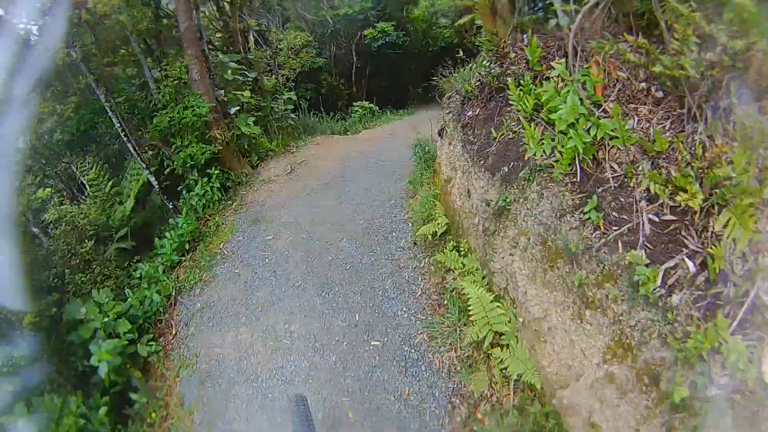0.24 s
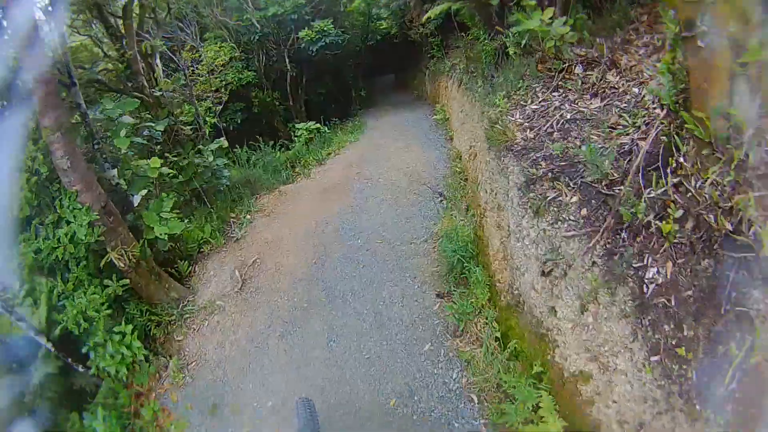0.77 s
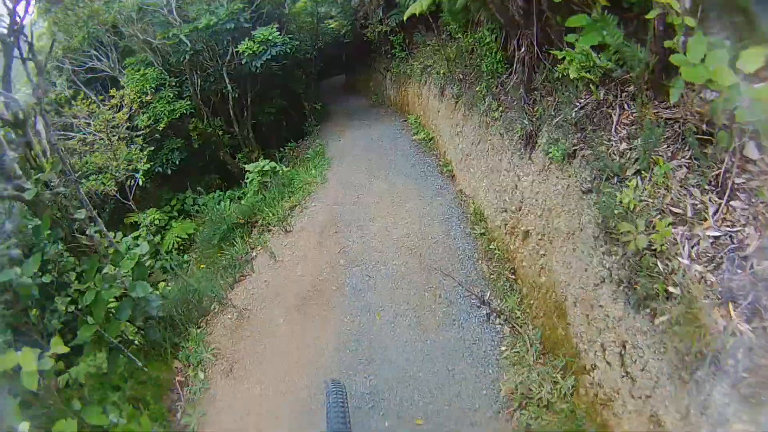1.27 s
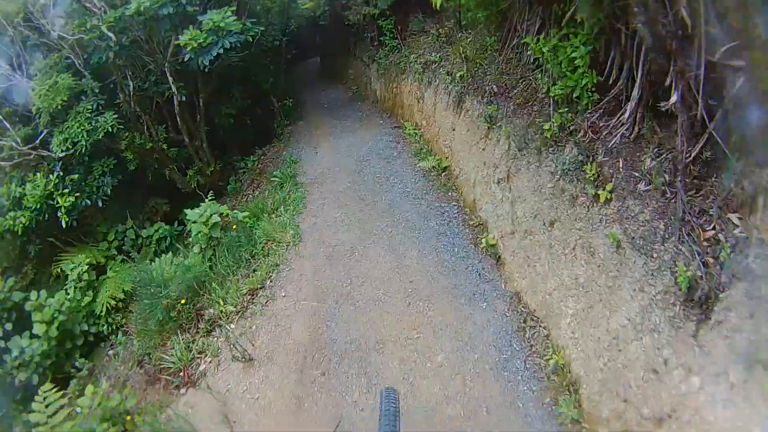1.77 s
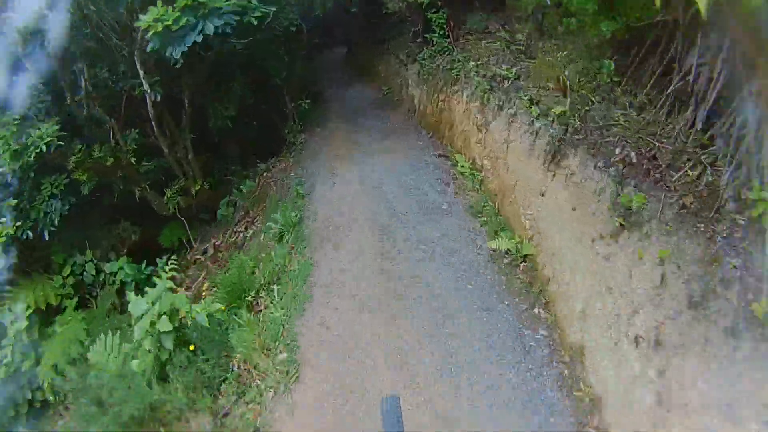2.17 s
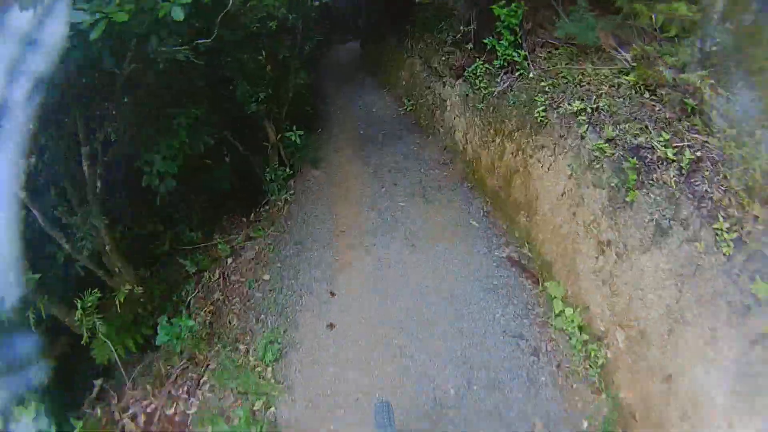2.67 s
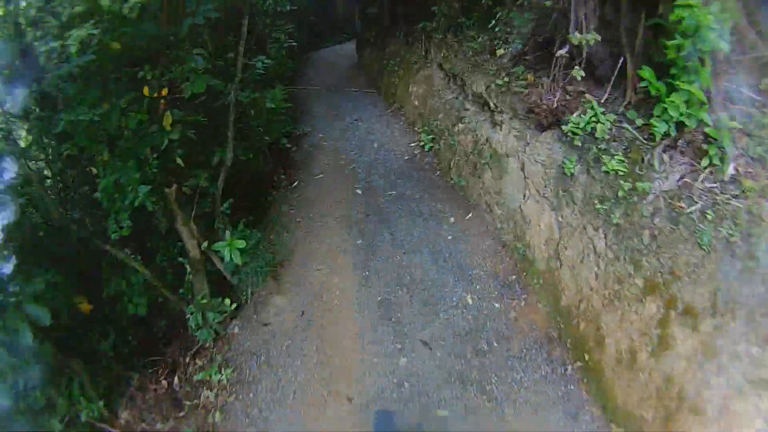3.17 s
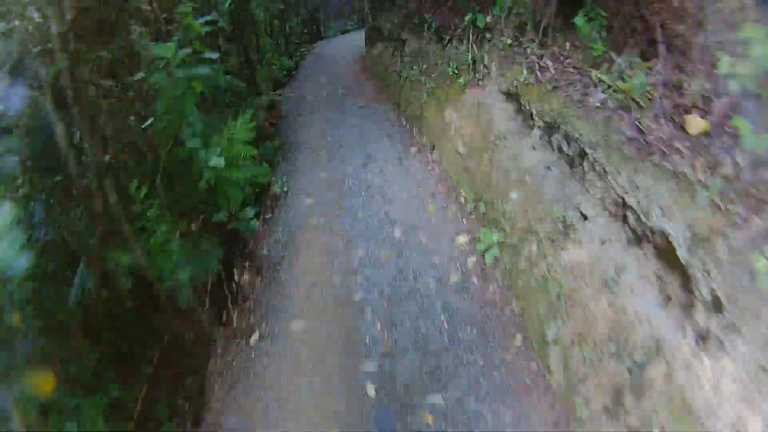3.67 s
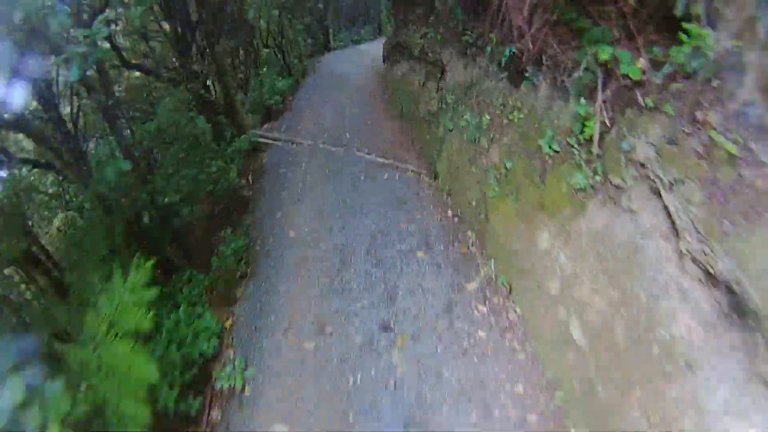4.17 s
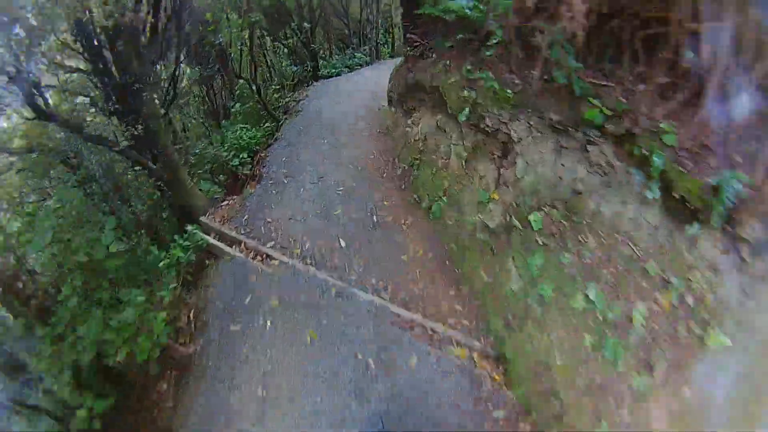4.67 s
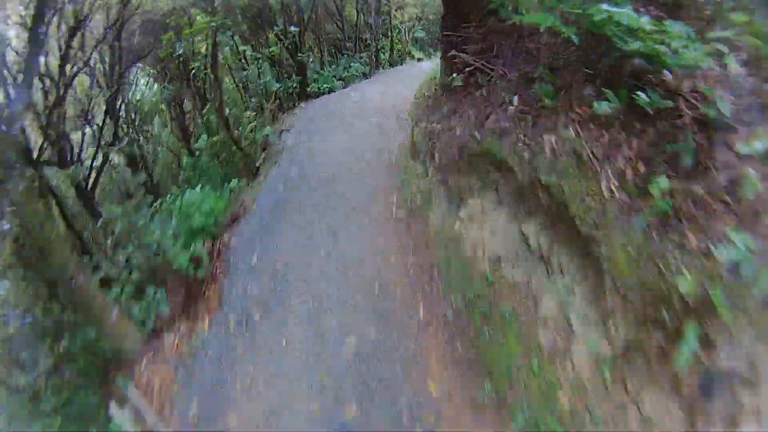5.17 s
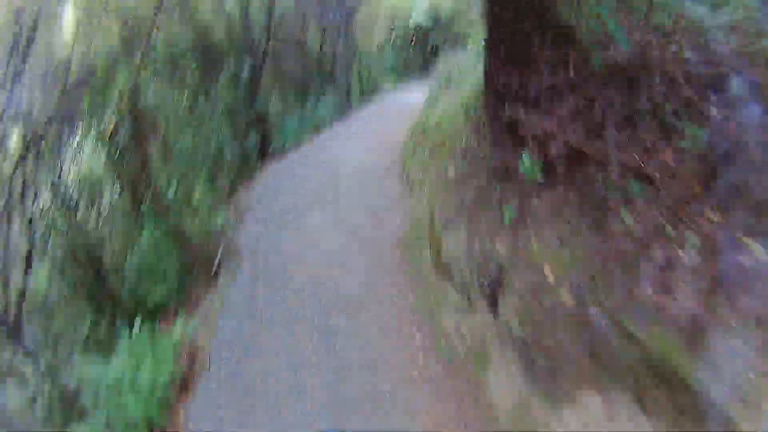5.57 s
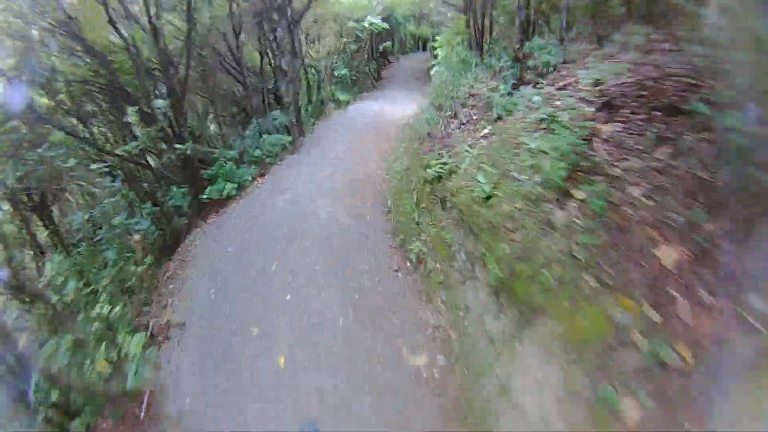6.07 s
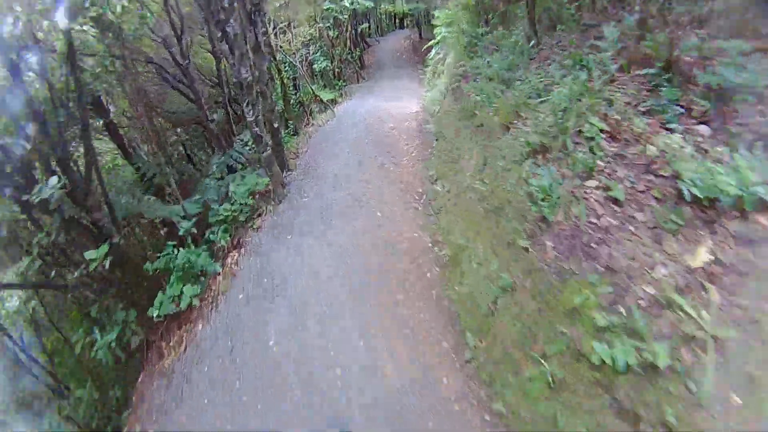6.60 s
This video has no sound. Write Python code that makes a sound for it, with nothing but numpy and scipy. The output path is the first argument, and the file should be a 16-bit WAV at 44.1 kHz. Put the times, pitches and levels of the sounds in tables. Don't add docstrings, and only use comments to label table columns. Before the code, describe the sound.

Close, dry sound from a microphone inside a plastic camera housing on a bicycle. Gravel crunches faintly over a low rumble, with sparse light taps at first. After two seconds bumps thicken into dull knocks, buzzing parts and short cracks, peaking near five and a half seconds with a hard slam and a faint low cable twang. It then eases to soft rolling, with slight hiss and thin whine.

```python
import sys
import numpy as np
from scipy import signal
from scipy.io import wavfile
from scipy.ndimage import uniform_filter1d

SR = 44100
rng = np.random.default_rng(int(sys.argv[2]) if len(sys.argv) > 2 else 0)


def level_to_linear(level):
    exponent = np.asarray(level, float) / 20
    return 10 ** exponent


def waveform_to_disk(signal):
    frames = np.transpose(np.atleast_2d(signal))
    scaled = np.clip(frames, -1, 1) * 32767
    samples = np.round(scaled).astype(np.int16)
    wavfile.write(sys.argv[1], SR, samples)


N = 301633

# centre_hz, width_hz, level_db
LOWER_PEAKS = [(487, 93, -3), (918, 120, -4.5), (1026, 100, -1.5), (1273, 244, 4.5), (1461, 255, 3)]
# centre_hz, width_hz, level_db
UPPER_PEAKS = [(1706, 300, -7.5), (1990, 115, 1), (2140, 97, 1), (2660, 310, -13)]
# centre_hz, width_hz, level_db
BRIGHT_PEAKS = [(3128, 174, 6), (4000, 242, 5.5), (4530, 500, -4.5), (5710, 360, -5.5), (7320, 510, -12),
                (11370, 160, -12.5)]


def rms_one(x):
    return x / np.sqrt(np.mean(x ** 2) + 1e-20)


def drift(rate_hz):
    pole = np.exp(-80 * np.pi * rate_hz / SR)
    white = rng.standard_normal(N // 40 + 2002)
    slow = signal.lfilter([1], [1, -2 * pole, pole * pole], white)[2000:]
    return np.interp(np.arange(N) / 40, np.arange(len(slow)), rms_one(slow))


def add(track, start_s, sound):
    i = round(start_s * SR)
    track[i:i + len(sound)] += sound[:N - i]


def low_pass(x, order, cutoff_hz):
    return signal.sosfilt(signal.butter(order, cutoff_hz, fs=SR, output="sos"), x)


def resonate(x, peaks):
    out = 0
    for k, (centre_hz, width_hz, level_db) in enumerate(peaks):
        r = np.exp(-np.pi * width_hz / SR)
        b = [(1 - r * r) / 2, 0, (r * r - 1) / 2]
        a = [1, -2 * r * np.cos(2 * np.pi * centre_hz / SR), r * r]
        out = out + (-1) ** k * level_to_linear(level_db) * signal.lfilter(b, a, x)
    return out


def decay(t_s, t60_s):
    return level_to_linear(-60 * t_s / t60_s)


def coloured(spectrum, low_hz, count, patchy_db):
    edges_hz = low_hz * 2 ** (np.arange(count + 1) / 2)
    points_hz, points_db = np.transpose(spectrum)
    white = rng.standard_normal((2, N + SR))
    together = drift(4.8)
    out = 0
    for k, (low, high) in enumerate(zip(edges_hz, edges_hz[1:])):
        sos = signal.butter(2, [low, high], "band", fs=SR, output="sos")
        band = signal.sosfilt(sos, white[k % 2])[SR:]
        level_db = np.interp(np.log(low * high) / 2, np.log(points_hz), points_db)
        flicker_db = patchy_db * (together + 1.42 * drift(18.2))
        out = out + band * level_to_linear(level_db + flicker_db)
    return rms_one(out)


def grit(per_s, spread_db, clump_db):
    size_db = spread_db * np.minimum(rng.exponential(1, N), 5)
    sizes = level_to_linear(size_db) * rng.choice([-1, 1], N)
    born = rng.random(N) < per_s / SR
    return rms_one(sizes * born * level_to_linear(clump_db * drift(22.0)) + 1e-18)


def housing_knocks():
    # start_s, swing_db, contact_db
    knocks = [(0.132, -31.5, -40.5), (0.246, -33.5, -40), (1.732, -31, -40), (1.797, -36.5, -52),
              (2.19, -19.5, -27.5), (2.54, -25, -30.5), (2.633, -32.5, -42), (2.687, -31.5, -42),
              (2.823, -28, -40), (2.984, -27, -37), (3.043, -34.5, -59), (3.42, -22, -31),
              (3.504, -30.5, -41.5), (3.615, -26, -32.5), (3.725, -33, -43), (3.774, -33.5, -42.5),
              (3.92, -26.5, -31.5), (4.229, -20.5, -31.5), (4.381, -22, -30), (4.457, -32.5, -41),
              (4.557, -25, -31), (4.703, -32, -50), (4.873, -29.5, -35.5), (5.205, -29.5, -42.5),
              (5.296, -25, -32), (5.372, -26, -30.5), (5.827, -30.5, -46)]
    # start_s, swing_db, contact_db
    nudges = [(0.031, -38, -62), (0.092, -47, -55), (0.184, -47, -51), (0.377, -43.5, -50),
              (0.568, -47.5, -53), (0.641, -41.5, -54), (0.762, -47.5, -59), (0.869, -42.5, -57),
              (1.041, -48, -58), (1.258, -53, -58), (1.696, -46, -49), (1.873, -40.5, -58),
              (2.296, -48.5, -51), (2.353, -39.5, -69), (2.459, -37, -52), (2.778, -43, -54),
              (4.946, -40.5, -52), (5.979, -48, -53), (6.073, -43.5, -54), (6.432, -48, -54),
              (6.513, -46.5, -46.5), (6.571, -48, -55), (6.662, -38.5, -41.5)]
    # start_s, swing_db, contact_db
    slams = [
        (3.3295, -21.5, -31.5),
        (4.829, -40, -42.5),
        (5.044, -38.5, -50),
        (5.116, -19, -22),
        (5.481, -14.5, -23),
    ]
    # start_s, swing_db, contact_db
    backstops = [
        (2.134, -36.5, -40),
        (3.549, -33.5, -42.5),
        (3.841, -31, -41),
        (3.992, -33.5, -37),
        (4.332, -32.5, -35),
        (5.234, -30, -36),
        (5.429, -34, -35),
        (5.582, -29.5, -26),
        (6.788, -39, -46.5),
    ]
    # start_s, swing_db, contact_db
    rebounds = [(1.455, -41.5, -50), (2.199, -32, -35), (2.587, -54, -48), (3.356, -23, -33.5),
                (3.38, -23, -25.5), (3.433, -40, -21), (3.823, -35, -41), (3.972, -40, -34),
                (4.264, -38, -29), (5.17, -44, -29), (5.218, -26, -30), (5.545, -24, -20),
                (5.66, -40.5, -40), (6.002, -39, -45), (6.214, -54, -51), (6.471, -50, -54)]
    knock_kind = -1.056, 0.0014, 56.3, (0.04, -4.5), (0.45, 2.5), (1, 0)
    nudge_kind = -1.09, .0008, 61, (0.28, -2.3), (0.46, 1.4), (1, 0)
    slam_kind = -0.99, 0.00075, 78.4, (.1, -6.5), (0.5, 1.7), (0.82, 0)
    backstop_kind = 0.99, 0.0004, 76.5, (0.93, -6), (1, 11.1), (0.42, 0)
    rebound_kind = -0.85, 0.0015, 65.3, (0.55, -5), (0.66, 0), (.4, -13)
    # mode_hz, level_db, t60_s
    mount = [(182.9, 0, 0.072), (253.7, -5.5, 0.033)]
    # mode_hz, level_db, t60_s
    body = [(330.5, -9, 0.057), (495.6, 2, 0.032), (626, -50, 0.0042), (886, -16, 0.054)]
    # mode_hz, level_db, t60_s
    shell = [(1218, -14, 0.014), (1330, 0, 0.018), (1780, -8, 0.018), (1930, -60, 0.01), (3120, -16, 0.018),
             (5600, 1, 0.0023)]
    lag_s = 0.0042
    stiffen_hz_per_db = 0.78
    stiff_damping_power = 0.42

    out, t = np.zeros(N), np.arange(round(.14 * SR)) / SR
    modes = mount + body + shell
    for blows, (way, contact_s, kind_hz, *laws) in ((knocks, knock_kind), (nudges, nudge_kind),
                                                    (slams, slam_kind), (backstops, backstop_kind),
                                                    (rebounds, rebound_kind)):
        spreads_db = rng.normal(0, 2.8, (len(blows), len(modes)))
        detunes = 1 + rng.normal(0, .025, spreads_db.shape)
        contact = 1 - np.exp(-t / contact_s)
        swing_t60_s = 0.062 * (56 / kind_hz) ** stiff_damping_power
        for (start_s, swing_db, hit_db), spread_db, detune in zip(blows, spreads_db, detunes):
            mount_db, body_db, shell_db = [swing_db + share * (hit_db - swing_db) + db for share, db in laws]
            swing_hz = np.clip(kind_hz + stiffen_hz_per_db * (swing_db + 32.5), 40, 120)
            turns = swing_hz * t * (0.65 + 0.42 * np.exp(-t / 0.034))
            swing = np.cos(2 * np.pi * turns - .25) * (1 + t / 0.0057) * decay(t, swing_t60_s)
            sound = level_to_linear(swing_db + 3.5) * swing * contact
            levels_db = [mount_db + 2.5] * len(mount) + [body_db - 5.5] * len(body)
            levels_db = levels_db + [shell_db + 5.0] * len(shell) + spread_db
            for (mode_hz, mode_db, t60_s), level_db, bend in zip(modes, levels_db, detune):
                ring = np.sin(2 * np.pi * mode_hz * bend * t) * decay(t, t60_s)
                sound += level_to_linear(level_db + mode_db) * ring
            add(out, start_s + lag_s - 0.00136 * (way > 0), way * sound)
    return low_pass(out + 1e-18, 3, 2600)


def rattles():
    # start_s, level_db, upper_share_db
    single_taps = [(0.0487, -49.5, 15.5), (0.237, -49.5, 8.5), (0.455, -40, -1), (0.5292, -43, -9),
                   (0.695, -50, 9), (0.945, -55.5, 14.5), (1.1712, -58, 19), (1.538, -51, -2),
                   (2.1756, -35, -25), (2.259, -54, 9), (3.116, -46, 0), (3.5823, -50, -8),
                   (3.811, -51, 14), (4.349, -27.5, -0.5), (5.227, -42.5, 12.5), (5.514, -23, -11),
                   (5.529, -27.5, -35), (5.5833, -16.5, -3.5), (5.694, -53, 14), (6.114, -52, 9),
                   (6.185, -50, 9), (6.327, -53, 14.5), (6.372, -57, 10), (6.394, -48.5, 6.5),
                   (6.471, -43.5, -4), (6.7395, -45, -2)]
    # start_s, level_db, length_s, upper_share_db, bright_share_db
    buzzes = [(2.595, -40, .03, -13, -23), (2.64, -35, .0058, -16, -26), (3.348, -32, .023, -14, -20),
              (3.398, -40, 0.0094, -6, -23), (3.435, -30, 0.019, -3, -21), (3.626, -33.5, .026, -4, -17),
              (3.657, -32.5, 0.037, -11, -19), (3.7, -37.5, 0.046, -3, -14), (4.018, -38.5, 0.02, 6, -16),
              (4.268, -48, .01, -6, -9), (4.47, -37.5, 0.058, -16, -20), (4.568, -37.5, 0.024, -16, -17),
              (4.613, -37.5, 0.0084, 0, -25), (4.817, -54, .006, -16, -24),
              (5.118, -34.5, 0.035, -6, -15.5), (5.233, -34.5, 0.026, -15, -20),
              (5.282, -39.5, .01, 0, -24), (5.413, -45, .008, -12, -30), (5.491, -31.5, 0.036, -1.5, -13),
              (5.542, -30, 0.034, -10, -16), (5.578, -23.5, 0.008, -6, -23), (5.593, -34, 0.0062, -7, -15)]
    tap_s, tap_bright_db, tap_bright_follows = 0.0055, -18, 0.65

    touches, t = np.zeros((3, N)), np.arange(round(.09 * SR)) / SR
    chatter = grit(per_s=4000.0, spread_db=2.5, clump_db=1.5)
    events = [(start_s, level_db, tap_s, upper_db, tap_bright_db + tap_bright_follows * upper_db)
              for start_s, level_db, upper_db in single_taps]
    for start_s, level_db, length_s, upper_db, bright_db in events + buzzes:
        i = round(start_s * SR)
        run = chatter[i:i + len(t)] * decay(np.maximum(t - length_s, 0), 0.0071)
        run[0] = 0.085 / (length_s + 0.0021)
        for part, share_db in zip(touches, (0, upper_db, bright_db)):
            add(part, start_s, level_to_linear(level_db + 5.5 + share_db) * run)
    lower, upper, bright = [resonate(part + 1e-18, peaks)
                            for part, peaks in zip(touches, (LOWER_PEAKS, UPPER_PEAKS, BRIGHT_PEAKS))]
    return low_pass(lower + upper, 2, 2800) + signal.lfilter([.6], [1, -.4], bright)


def seal_cracks():
    # start_s, step_db, sharpness_hz
    slips = [(2.2112, -25, 500), (3.3843, -22, 12000), (3.4426, -30.5, 12000), (4.349, -40, 8000),
             (5.13, -37, 14000), (5.1664, -32, 4000), (5.1717, -35, 4000), (5.1749, -21.5, 14000),
             (5.4942, -35, 14000), (5.5562, -24.5, 12200), (5.5822, -25, 6000), (5.595, -42, 12000)]
    # delay_s, level_db
    afterslips = [(0, 1.5), (.003, -3.5), (.0045, -42), (.0055, -21)]
    port_peaks = [(4000, 1100, -26.0), (8000, 650, -13.5), (11500, 380, -11)]    # centre_hz, width_hz, level_db

    out, t = np.zeros(N), np.arange(round(.03 * SR)) / SR
    for start_s, step_db, edge_hz in slips:
        step = (1 - np.exp(-2 * np.pi * edge_hz * t)) * np.exp(-t / 0.0043)
        for delay_s, later_db in afterslips:
            add(out, start_s + delay_s, -level_to_linear(step_db + later_db) * step)
    return out + level_to_linear(22.5) * resonate(out + 1e-18, port_peaks)


def cable_twang():
    # start_s, level_db, pitch_hz, t60_s
    plucks = [
        (5.6, -38, 334, 0.57),
    ]
    out, t = np.zeros(N), np.arange(SR // 2) / SR
    for start_s, level_db, pitch_hz, t60_s in plucks:
        add(out, start_s, level_to_linear(level_db) * np.sin(2 * np.pi * pitch_hz * t) * decay(t, t60_s))
    return out


def ground():
    # start_s, load_db, roughness_db
    track = [(0.0, -63, -60), (.82, -63.5, -63), (1.22, -65, -64), (1.73, -60, -63), (2.59, -55, -49.5),
             (2.95, -54.5, -54), (3.26, -49.5, -60.5), (3.52, -50.5, -50), (3.77, -51.5, -59),
             (4.1, -50.5, -52.5), (4.48, -49, -58), (4.8, -54.5, -51.5), (5.2, -59.5, -52),
             (5.52, -54, -47), (5.81, -57.5, -60.5), (6.1, -61, -62), (6.3, -61.5, -66.5),
             (6.84, -55, -55.5)]
    start_s, *controls_db = np.transpose(track)
    return [np.interp(np.arange(N) / SR, start_s, c - c.mean()) for c in controls_db]


def gravel_crunch(load_db):
    common = grit(per_s=1500.0, spread_db=4.0, clump_db=0.0)
    out = 0
    # mean_db, share of the load swing
    for mean_db, share, peaks in ((-58.5, 0.93, LOWER_PEAKS), (-60, 0.78, UPPER_PEAKS),
                                  (-67.5, 0.85, BRIGHT_PEAKS)):
        stones = common + level_to_linear(1.5) * grit(per_s=4000.0, spread_db=1.0, clump_db=2.0)
        out = out + level_to_linear(mean_db + share * load_db) * rms_one(resonate(stones, peaks))
    return out


def mount_shake(rough_db):
    # freq_hz, density_db (per Hz)
    shake_spectrum = [(12, -30), (20, 13.5), (47, -3.5), (102, -11.5), (183, -12), (325, -15), (524, -17),
                      (900, -27.5), (1170, -54), (1980, -120)]
    return level_to_linear(-47.5 + 0.46 * rough_db) * coloured(shake_spectrum, 20.03, count=11, patchy_db=2.0)


def electronics():
    # freq_hz, density_db
    hiss_spectrum = [(1470, -30), (2500, -3.5), (4020, -7), (6450, -10.5), (11300, -8.5), (12200, -13.5),
                     (14000, -1), (16000, -9.5)]
    hiss_db, whine_db = -68, -69
    whine_hz, pulse_hz, pulse_start_s, duty = 13750, 52.5, .006, .68

    t = np.arange(N) / SR
    on = ((t - pulse_start_s) * pulse_hz % 1 < duty) * 1.
    whine = uniform_filter1d(on, size=40) * np.sin(2 * np.pi * whine_hz * t) * level_to_linear(1.0 * drift(7.6))
    hiss = coloured(hiss_spectrum, 2455, count=6, patchy_db=0.57)
    hiss += resonate(hiss, [(11260, 250, -5), (6940, 210, -17.0)])
    hiss = signal.sosfilt(signal.cheby2(10, 40, 16300, fs=SR, output="sos"), hiss)
    return level_to_linear(whine_db) * whine + level_to_linear(hiss_db + 2) * hiss


def scene():
    load_db, rough_db = ground()
    blows = housing_knocks() + rattles() + seal_cracks() + cable_twang()
    rolling = gravel_crunch(load_db) + mount_shake(rough_db)
    return (blows + rolling + electronics())[None]


def top_cut(x):
    return signal.sosfilt(signal.butter(12, 16590, fs=SR, output="sos"), x)


def record(dry):
    cut = signal.sosfilt(signal.butter(2, 15, "high", fs=SR, output="sos"), dry)
    cut = signal.sosfilt(signal.cheby2(8, 50, 16800, fs=SR, output="sos"), cut)
    return top_cut(cut)


dry = scene()
out = record(dry)
waveform_to_disk(out)
```